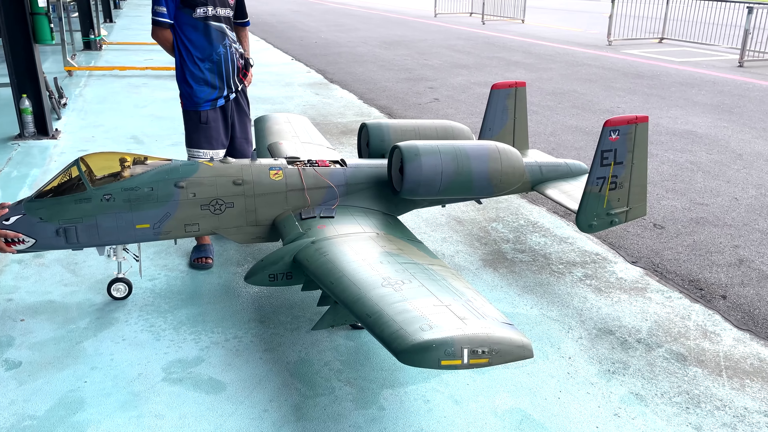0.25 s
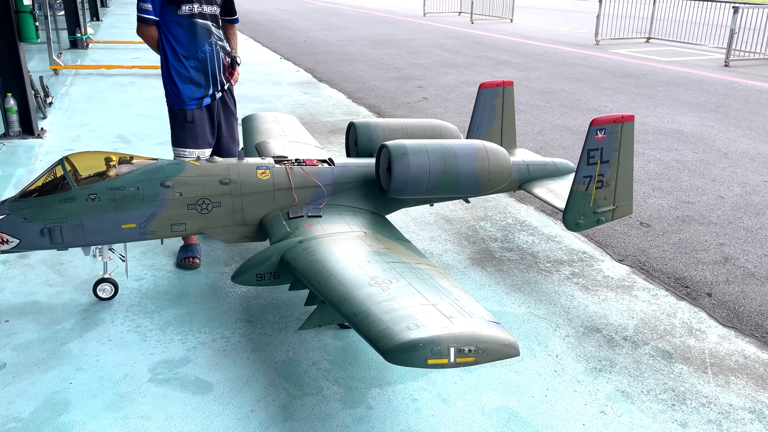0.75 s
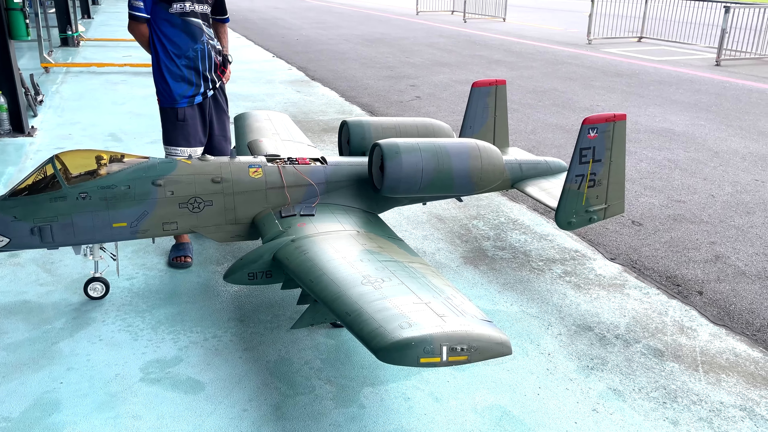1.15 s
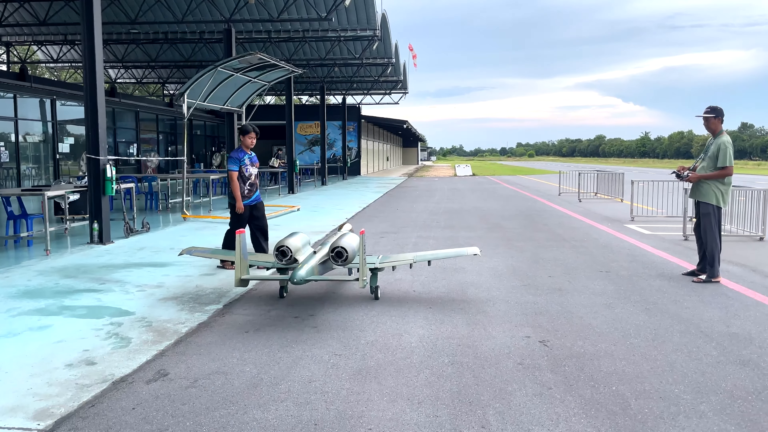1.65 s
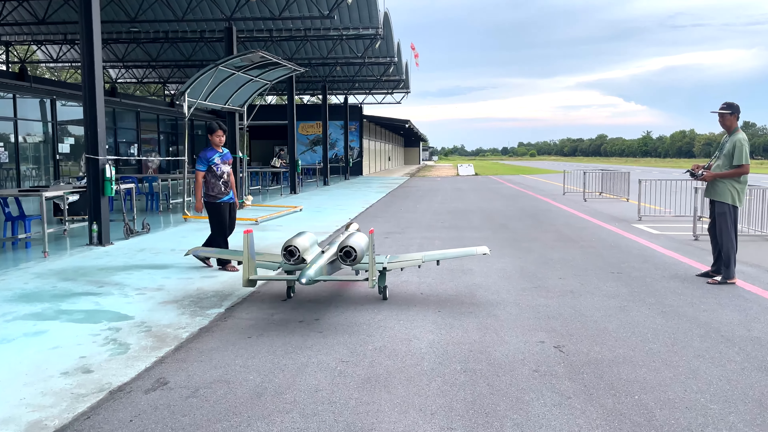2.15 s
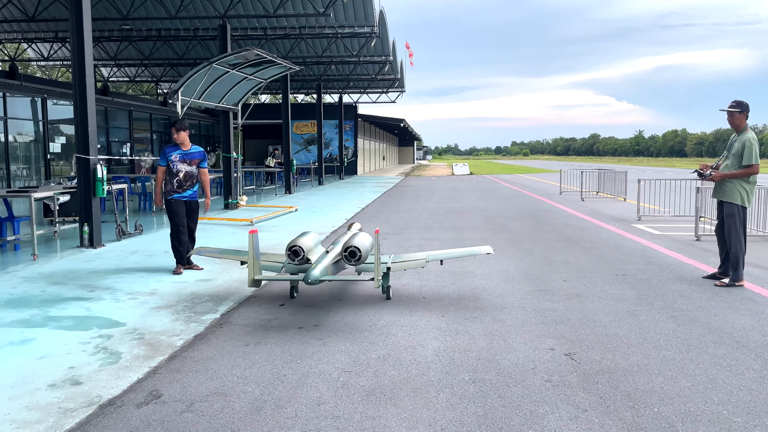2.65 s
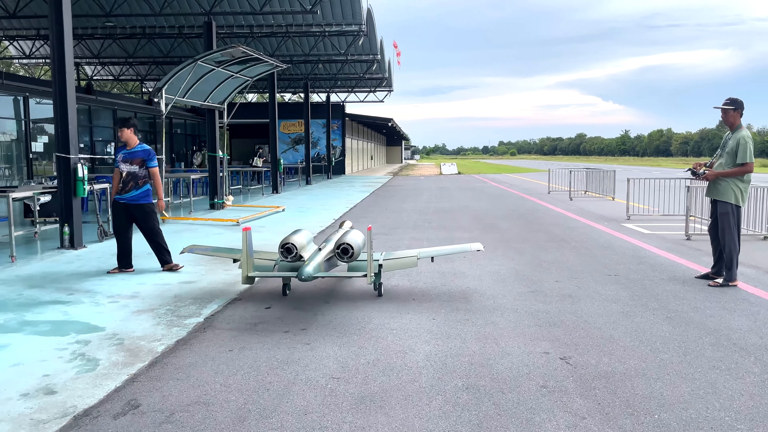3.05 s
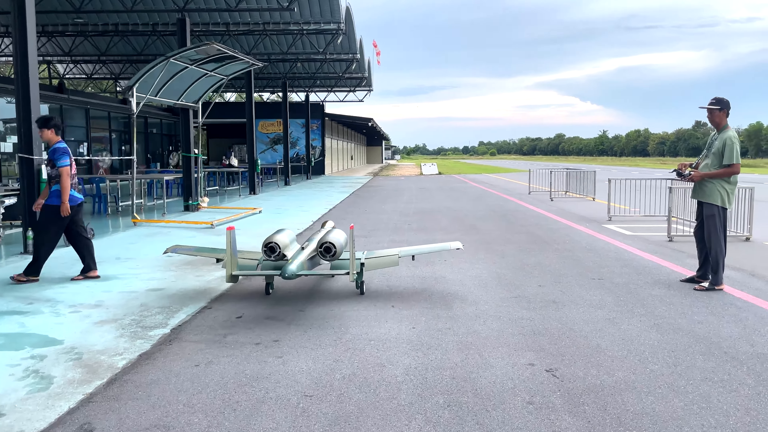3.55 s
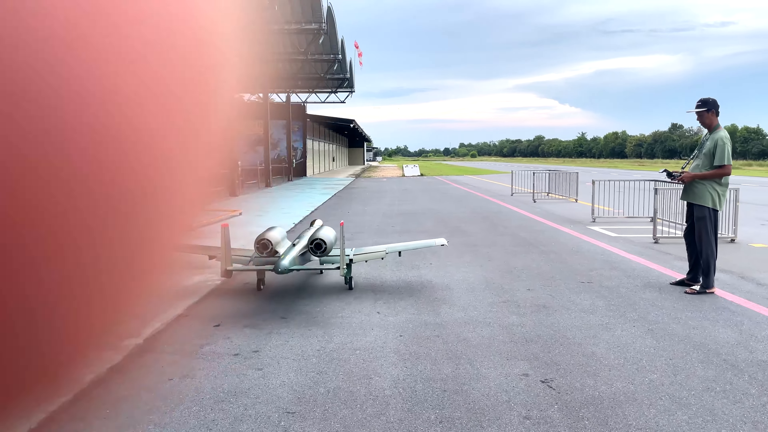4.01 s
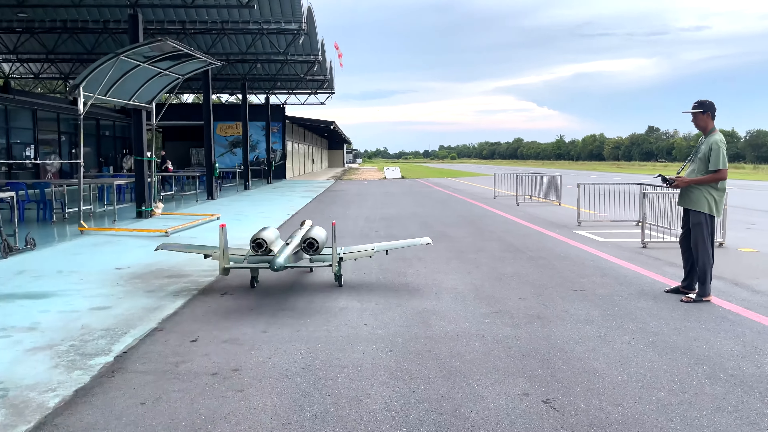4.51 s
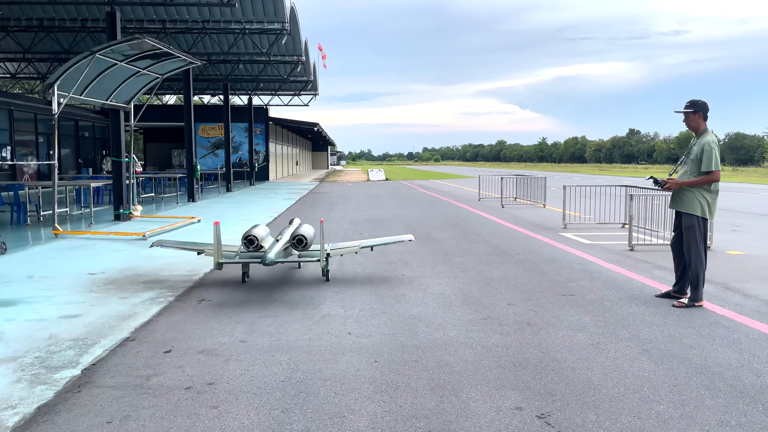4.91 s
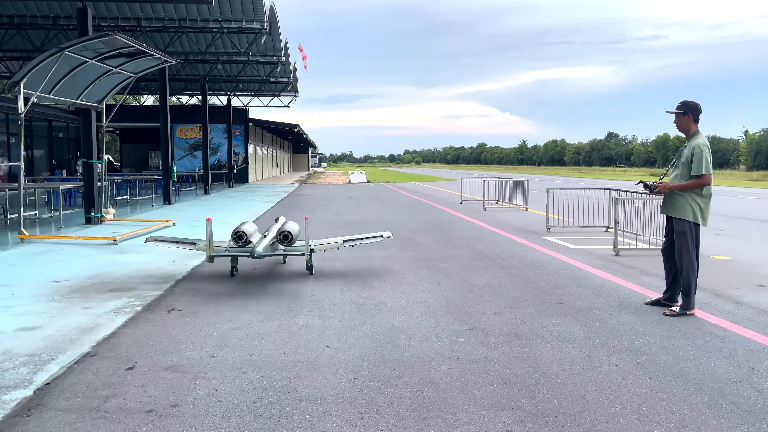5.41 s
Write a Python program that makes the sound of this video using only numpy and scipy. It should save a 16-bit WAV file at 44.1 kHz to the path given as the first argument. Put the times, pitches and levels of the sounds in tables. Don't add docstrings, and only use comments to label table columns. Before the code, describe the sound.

Close beside a model jet, a clear, piercing turbine whine near four and a half kilohertz climbs and throbs over hollow roar and hiss. At about 1.3 seconds the sound jumps behind the nozzles: much bassier exhaust roar, a smeared very high whine, brief howls and gusty low thumps that push and slightly overload the stereo microphones.

```python
import sys
import numpy as np
from scipy import signal
from scipy.io import wavfile
from scipy.ndimage import uniform_filter1d, minimum_filter1d

SR = 44100
rng = np.random.default_rng(int(sys.argv[2]) if len(sys.argv) > 2 else 0)


def amplitude_ratio(level_db):
    exponent = np.asarray(level_db, float) / 20
    return 10 ** exponent


def unload_wav(signal):
    wavfile.write(
        sys.argv[1],
        SR,
        np.round(np.clip(np.atleast_2d(signal).T, -1, 1) * 32767).astype(np.int16),
    )


N = 250046
T = np.arange(N) / SR
MOVE_S = 1.296

# pitch in Hz, strength in dB per Hz, left-right likeness from 0 to 1, left lead in radians,
# left-right difference in dB.
HISS_BESIDE = [(1500, -77.5, 0.23, -2, 2), (2000, -75, 0.58, -1.1, 3.2), (2420, -77.5, 0.12, 0.5, 2),
               (2840, -74.5, 0.63, 0.5, 0), (3520, -78.5, 0.21, 1.66, 3), (4920, -76.5, 0.3, 0.79, 0),
               (5710, -88, 0.16, 8.5, -0.4), (6640, -73.5, 0.73, 5, 0.5), (7700, -89, 0.34, 8, -1),
               (8100, -78.5, 0.95, 10, 0.5), (9680, -80, 0.59, 9.5, 0.8), (11030, -83, 0.83, 7.5, -3),
               (12400, -86, 0.82, 8, -2), (13000, -94, 0.95, 7, 1)]
ROAR_BEHIND = [(25.2, -101, 0.65, 0.1, -7), (57, -41, 1, 0.18, 1), (119, -44.5, 0.89, 0.16, 1),
               (214.76, -44, 1, 0.28, 2.5), (333, -52.5, 0.99, 0.23, 2), (476, -59.5, 1, 0.85, 1.5),
               (586, -63.5, 0.78, 1.2, 6.5), (723, -63, 0.52, 0.7, 8.5), (778, -58, 0.99, 0.72, 5.5),
               (996, -62.5, 0.99, 1.45, 8.5), (1040, -58, 0.32, 1.75, 9), (1364, -64.5, 0.48, 0.92, 6),
               (1560, -66.5, 0.16, 2.74, 0.5), (1790, -71, 0.1, 1.6, 6.5)]
HISS_BEHIND = [(1816, -69.5, 0.43, 3.1, 2.5), (2330, -76, 0.068, 5.85, -3.5), (2550, -73.5, 0.13, 6.6, -2),
               (3550, -77, 0.18, 8.5, 0.5), (4000, -80.5, 0.37, 6.1, -2.5), (4940, -79, 0.6, 7.1, 6.5),
               (5820, -83, 0.16, 3.1, -6), (5920, -83.5, 0.29, 4.3, 10), (6620, -79.5, 0.35, 5.7, -1.5),
               (7580, -83, 0.59, 3.2, 4), (8540, -79.5, 0.9, 3.33, -3), (9360, -81.5, 0.84, 2.43, -1),
               (11540, -85, 0.66, 1.36, -0.1), (13020, -85, 0.9, 0.62, -0.5)]
# time in seconds, slower engine in Hz, faster engine in Hz.
SPOOL_BEHIND = [(1.3, 4745, 4767), (1.45, 4816, 4860), (1.85, 5115, 5160), (2.05, 5260, 5364),
                (2.45, 5590, 5700), (2.85, 5875, 6075), (3.25, 6145, 6346), (3.55, 6320, 6500),
                (3.85, 6451, 6610), (4.05, 6510, 6655), (4.25, 6545, 6673), (4.55, 6523, 6624),
                (4.85, 6444, 6503), (5.05, 6408, 6433), (5.67, 6305, 6325)]
# time in seconds, level in dB.
THRUST = [(1.3, -4), (1.6, -1.5), (2.05, -1.5), (2.15, 0), (2.45, -0.9), (2.95, -0.5), (3.6, 1), (4.4, 0),
          (5.67, -1.65)]
# centre in seconds, rise in dB, length in seconds.
GUSTS = [(1.36, 0, 0.11), (1.52, 0.5, .1), (1.68, 2, 0.05), (1.9, 5, 0.16), (2.12, 5, 0.098),
         (2.55, 0.5, .2), (2.95, 7, 0.12), (3.23, 5, 0.11), (3.42, 6.5, 0.096), (3.55, 5, 0.12),
         (3.96, 4, 0.078), (4.25, -0.5, .15), (4.42, 3.5, 0.081), (4.84, 7.5, .1), (4.99, 5, .06),
         (5.32, 3, .16)]
HISS_BEHIND_DB = -40


def evened(x):
    return x / np.sqrt(np.mean(abs(x) ** 2) + 1e-20)


def curve(rows, at=T):
    first, *columns = np.transpose(rows)
    return [np.interp(at, first, c) for c in columns]


def swells(rows):
    return sum(db * np.exp(-(2 * (T - s) / length) ** 2) for s, db, length in rows)


def rush(field, lo_hz, hi_hz, size, patchy_db, end_hz, top_hz=None):
    hop = size // 4
    frames, hz = N // hop + 5, np.fft.rfftfreq(size, 1 / SR)
    a, b, c, d, patches = rng.standard_normal((frames, len(hz), 5)).T
    patches = uniform_filter1d(patches, size=8, axis=0)
    patches = evened(uniform_filter1d(patches, size=10, axis=1))

    first, *columns = np.transpose(field)
    db, alike, lead, balance_db = (np.interp(np.log(hz + 1), np.log(first), c)[:, None] for c in columns)
    alike = np.clip(alike, 0, 1)
    left = a + 1j * b
    right = alike * left + np.sqrt(1 - alike ** 2) * (c + 1j * d)
    z = np.array([left * np.exp(1j * lead) * amplitude_ratio(balance_db / 2), right * amplitude_ratio(-balance_db / 2)])
    z *= amplitude_ratio(db + patchy_db * patches) * ((hz >= first[0]) & (hz < end_hz))[:, None]
    if top_hz is not None:
        z *= hz[:, None] < np.interp(np.arange(frames) * hop, np.arange(N), top_hz)

    inside = ((hz >= lo_hz) & (hz < hi_hz))[:, None]
    x, band = (signal.istft(v, nperseg=size, noverlap=size - hop)[1][..., :N] for v in (z, z.mean(0) * inside))
    return x / np.sqrt(np.mean(band ** 2))


def flutter(width_hz):
    z = rng.standard_normal((2, N)) + 1j * rng.standard_normal((2, N))
    bell = np.exp(-(np.fft.fftfreq(N, 1 / SR) / width_hz) ** 2)
    return evened(np.fft.ifft(z * bell))


def tone(hz, db, field, width_hz, steady, alike=0.83, beat=1):
    _, _, lead, balance_db = curve(field, hz)
    steady, alike = np.clip([steady, alike], 0, 1)
    a, b = flutter(width_hz)
    scattered = np.array([a, alike * a + np.sqrt(1 - alike ** 2) * b])
    z = beat * (np.sqrt(steady) + np.sqrt(1 - steady) * scattered)
    z[0] *= np.exp(1j * lead)
    carrier = np.exp(2j * np.pi * (np.cumsum(hz) / SR + rng.random()))
    return np.sqrt(2) * (z * carrier).real * amplitude_ratio(db + np.array([balance_db, -balance_db]) / 2)


def roar_beside():
    # pitch in Hz, strength in dB per Hz, likeness from 0 to 1, left lead in radians,
    # left-right difference in dB.
    roar_field = [(25, -95, 0.89, -0.1, 2.0), (60.6, -57, 0.98, -0.015, 0), (130, -59.5, 1, -0.17, 2.5),
                  (172, -57, 1, -0.0, 0.5), (223, -44.5, 1, 0.031, 2.7), (324, -66.5, 0.96, 0.08, -1),
                  (383, -55.5, 1, -0.0004, 3.5), (460, -53.5, 0.88, -0.065, 1.5),
                  (588, -67.5, 0.96, 0.68, 2), (760, -66.5, 0.84, -0.15, 3.5), (836, -71.5, 1, -0.019, 6),
                  (1040, -67.5, 0.74, 0.064, -1.5), (1300, -71, 0.93, 0.47, 9),
                  (1500, -78.5, 0.24, -0.24, -5)]
    # time in seconds, level in dB.
    nearness = [(0, 0.5), (.44, 0), (.5, -1.5), (.83, -1), (.86, -4.5), (1.3, -3.5)]
    near_db, = curve(nearness)
    roar = amplitude_ratio(-24.5 + near_db) * rush(roar_field, 60, 1500, size=4096, patchy_db=2.0, end_hz=1564)
    little_bass = signal.butter(3, 72, "high", fs=SR, output="sos")
    roar = signal.sosfilt(little_bass, roar)
    hiss_db = -45.5 + .95 * near_db
    hiss = amplitude_ratio(hiss_db) * rush(HISS_BESIDE, 5200, 8000, size=512, patchy_db=1.5, end_hz=13700)
    return roar + hiss


def throbbing(throbs):
    start, top_db, dip_db = np.transpose(throbs)
    place = np.interp(T, start, np.arange(len(start)))
    top = amplitude_ratio(top_db)[place.astype(int)]
    dip = amplitude_ratio(np.interp(T, start, dip_db))
    return top * np.sin(np.pi * place) + 1j * dip * np.cos(np.pi * place)


def whine_beside():
    # time in seconds, near engine in Hz, far engine in Hz.
    spool = [(0, 4412, 3365), (.33, 4515, 3416), (.69, 4632, 3476), (.97, 4723, 3524), (1.3, 4830, 3590)]
    # start in seconds, top in dB, dip in dB.
    near_throbs = [(0, -29, -38), (.055, -25, -35), (.141, -22, -38), (.212, -22, -32), (.286, -28, -57),
                   (.358, -30, -27), (.395, -25.5, -44), (.47, -16.5, -27), (.545, -21, -33),
                   (.61, -22.5, -31), (.671, -24, -41), (0.728, -21, -35), (0.791, -18, -31),
                   (.858, -22, -29), (.926, -22.5, -31), (.98, -23.5, -39), (1.033, -22.5, -35),
                   (1.106, -19, -41), (1.177, -25, -29), (1.251, -27, -36), (1.3, -36, -45)]
    far_throbs = [(0, -41, -46), (.095, -39, -54), (.27, -43, -62), (.42, -54, -62), (.56, -41, -62),
                  (.71, -47, -62), (.87, -48, -55), (1.02, -47, -55), (1.15, -48, -56), (1.3, -60, -60)]
    # engine (0 near, 1 far), multiple of the blade rate, first level in dB, last level in dB,
    # width in Hz, steady share from 0 to 1.
    overtones = [
        (0, 2, -34.5, -33, 12.5, 0.1),
        (0, 2.5, -58, -62, 12, .6),
        (0, 3, -50, -51.5, 16, 0.76),
        (1, 2, -47.5, -54, 78, 0.2),
        (1, 3, -36, -43, 25, 0.75),
        (1, 3.5, -63, -64, 20, .4),
        (1, 4, -51, -63, 20, 0.3),
    ]
    engines = curve(spool)
    out = tone(engines[0], -1.2, HISS_BESIDE, width_hz=31.0, steady=0.84, alike=.1, beat=throbbing(near_throbs))
    out += tone(engines[1], 1, HISS_BESIDE, width_hz=14, steady=.93, alike=.1, beat=throbbing(far_throbs))
    for engine, multiple, first_db, last_db, width_hz, steady in overtones:
        db = np.interp(T, [0, MOVE_S], [first_db, last_db])
        out += tone(multiple * engines[round(engine)], db, HISS_BESIDE, width_hz, steady)
    return out


def ceiling(whine_hz):
    # start in seconds, top in Hz, length in seconds.
    splashes = [
        (1.34, 15500, 0.031),
        (1.513, 11100, 0.043),
        (1.72, 11300, .045),
        (1.748, 13800, 0.0095),
        (2.2, 11900, .045),
        (3.43, 13900, 0.048),
    ]
    block = np.arange(N) // 1800
    top_hz = whine_hz + 200 + 130 * rng.exponential(1, block[-1] + 1)[block]
    for s, hz, length in splashes:
        top_hz[round(s * SR):][:round(length * SR)] = hz
    return top_hz


def exhaust_behind():
    (thrust_db,), gust_db = curve(THRUST), swells(GUSTS)
    _, fast_hz = curve(SPOOL_BEHIND)
    rumble_db = -26.5 + 0.26 * thrust_db + gust_db
    roar_db = -24 + 1.42 * thrust_db + 0.064 * gust_db
    hiss_db = HISS_BEHIND_DB + thrust_db
    out = amplitude_ratio(rumble_db) * rush(ROAR_BEHIND[:4], 30, 160, size=2048, patchy_db=1.5, end_hz=214.9)
    out += amplitude_ratio(roar_db) * rush(ROAR_BEHIND[3:], 160, 1700, size=1024, patchy_db=1.0, end_hz=1808)
    out += amplitude_ratio(hiss_db) * rush(HISS_BEHIND, 1500, 8800, size=512, patchy_db=1.49, end_hz=15600,
                               top_hz=ceiling(2 * fast_hz))
    return out


def drone_and_buffet():
    (thrust_db,), gust_db = curve(THRUST), swells(GUSTS)
    slow_hz, _ = curve(SPOOL_BEHIND)
    drone_hz = 119.7 + .065 * (slow_hz - slow_hz[0])
    out = tone(drone_hz, -32 + thrust_db, ROAR_BEHIND, width_hz=53, steady=0, alike=.95)
    out += tone(52.1 + 0 * T, -47 + 2.6 * gust_db, ROAR_BEHIND, width_hz=16, steady=0, alike=0.99)
    return out


def tailpipes():
    # pipe resonance (0 lower, 1 upper), centre in seconds, rise in dB, length in seconds.
    howls = [
        (0, 1.86, 14, 0.67),
        (1, 1.7, 3.5, 0.27),
        (1, 2.17, 9, .2),
        (1, 3.1, 0.5, .5),
        (1, 3.96, 6, 0.55),
    ]
    hiss_db = HISS_BEHIND_DB + curve(THRUST)[0]
    lower_db, upper_db = (swells(row[1:] for row in howls if round(row[0]) == pipe) for pipe in range(2))
    upper_hz = np.interp(T, [MOVE_S, 2.75], [2653, 2780])
    out = tone(2056 + 0 * T, hiss_db - 21 + lower_db, HISS_BEHIND, width_hz=60, steady=0, alike=0.57)
    out += tone(upper_hz, hiss_db - 9.5 + upper_db, HISS_BEHIND, width_hz=160, steady=0, alike=.8)
    return out


def puffs():
    # start in seconds, peak in dB, pitch in Hz.
    slaps = [(1.529, -5, 94), (1.6884, -8, 94), (2.922, -8, 102), (2.969, -2, 208), (3.078, -3, 230),
             (3.142, -2, 202), (3.387, -4.5, 187), (3.497, -2, 215), (3.961, -5.5, 193), (4.327, -8, 143),
             (4.812, -6.5, 305), (4.858, 1, 275), (5.241, -7, 227), (5.347, -1.5, 98), (4.826, -5, 68),
             (2.94, -5, 70), (3.535, -4, 63), (5.283, -8.5, 80), (4.22, -6.5, 90), (1.895, -8, 80)]
    out, t = np.zeros((2, N)), np.arange(2000) / SR
    chance = rng.random((len(slaps), 2))
    for (s, db, hz), (phase, side) in zip(slaps, chance):
        shape = (t / 0.0069) * np.exp(1 - t / 0.0054)
        slap = amplitude_ratio(db - 6.5) * shape * np.sin(2 * np.pi * (hz * t + phase))
        slap += amplitude_ratio(db - 18.5) * shape ** 2 * np.sin(2 * np.pi * (480 * t + side))
        out[:, round(s * SR):][:, :len(t)] += slap * amplitude_ratio(np.array([[3.], [-3.]]) * side)
    return out


def whine_behind():
    # blade rate in Hz, level in dB.
    whine_colour = [(4750, -37.5), (5150, -34.5), (5450, -34), (5900, -38.5), (6300, -43), (6500, -46),
                    (6670, -49.5)]
    slow_hz, fast_hz = curve(SPOOL_BEHIND)
    recede_db = -2 * np.maximum(T - 4.3, 0)
    out = np.zeros((2, N))
    for hz, engine_db in (slow_hz, 0), (fast_hz, -1.5):
        db = curve(whine_colour, hz)[0] + engine_db + recede_db
        blade_db = np.interp(hz, [5000, 6200], [-70, -57])
        triple_db = -67 - 60 * (hz > 5230)
        out += tone(2 * hz, db + 1, HISS_BEHIND, width_hz=70, steady=.02, alike=.98)
        out += tone(2 * hz - 60, db - 3, HISS_BEHIND, width_hz=190, steady=.02, alike=.97)
        out += tone(hz, blade_db, HISS_BEHIND, width_hz=22, steady=.02, alike=.6)
        out += tone(3 * hz, triple_db, HISS_BEHIND, width_hz=100, steady=.02, alike=.97)
    return out


def scene():
    beside = roar_beside() + whine_beside()
    behind = exhaust_behind() + drone_and_buffet() + tailpipes() + puffs() + whine_behind()
    moved = np.clip((T - MOVE_S) / 0.0047 + .5, 0, 1)
    return (1 - moved) * beside + moved * behind


def starve(dry, from_hz, floor_db, mask_db, side_db, high_side_db):
    hz, _, z = signal.stft([dry[0] + dry[1], dry[0] - dry[1]], SR, nperseg=2048)
    hz, bands = hz[:1024:8, None], z[:, :1024].reshape(2, 128, 8, -1)
    power_db = 10 * np.log10((abs(bands) ** 2).mean(2) / 4 + 1e-20)
    loud_near_db = -minimum_filter1d(-power_db.max(0), size=11, axis=0)
    opposed = (hz > 8250) & (hz < 8950)
    mid_floor_db = np.maximum(floor_db + 12.5 * opposed, loud_near_db - mask_db - 60 * (hz < 8250))
    side_floor_db = floor_db + np.where(hz < 11850, side_db, high_side_db)
    keep = np.array([power_db[0] > mid_floor_db, power_db[1] > side_floor_db]) | (hz < from_hz)
    z = np.concatenate([(bands * keep[:, :, None]).reshape(2, 1024, -1), z[:, 1024:]], 1)
    mid, side = signal.istft(z, nperseg=2048)[1][:, :N]
    return np.array([mid + side, mid - side]) / 2


def roll_off(x):
    return signal.sosfilt(signal.butter(12, 15710, fs=SR, output="sos"), x)


def record(dry):
    bass_cut = signal.butter(2, 28, "high", fs=SR, output="sos")
    dry = signal.sosfilt(bass_cut, dry)
    dry = .62 * np.tanh(dry / .62)
    thinned = starve(dry, from_hz=5000, floor_db=-79, mask_db=25, side_db=-3, high_side_db=12)
    return roll_off(thinned)


dry = scene()
out = record(dry)
unload_wav(out)
```